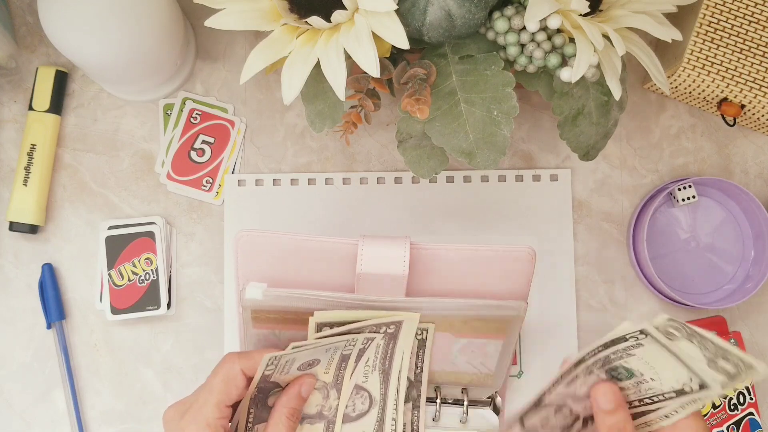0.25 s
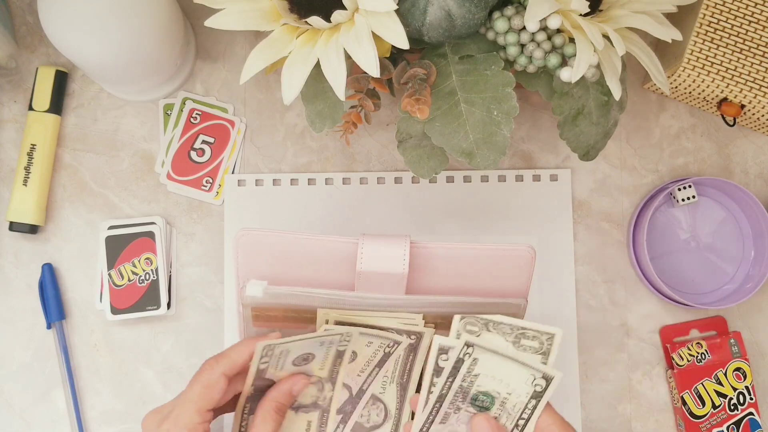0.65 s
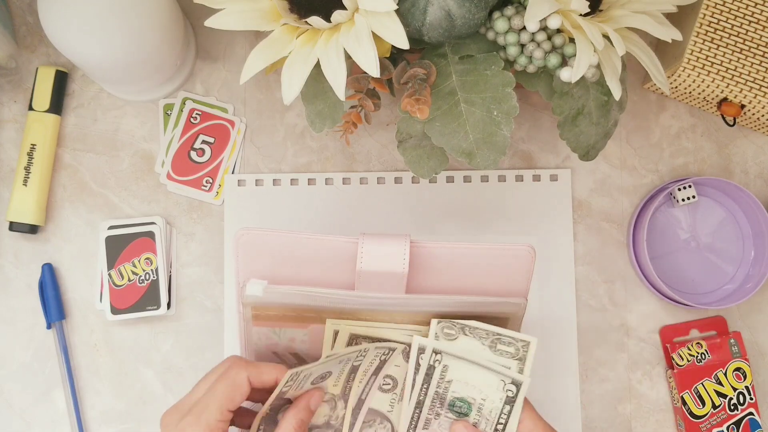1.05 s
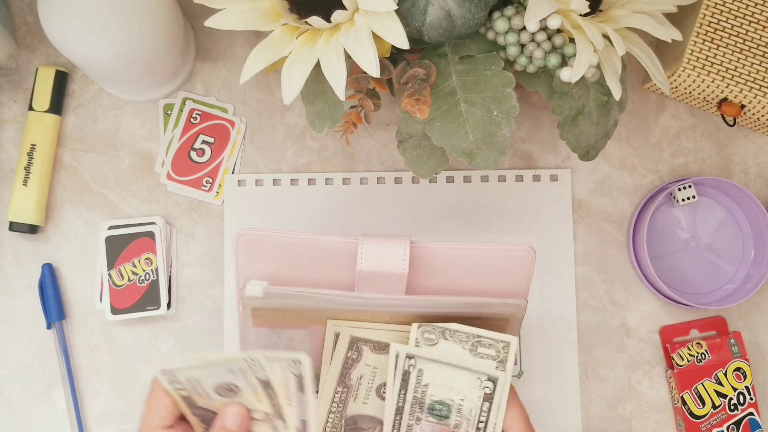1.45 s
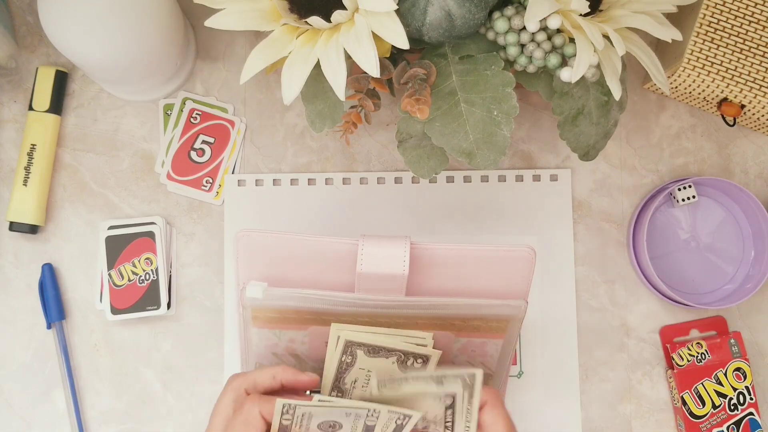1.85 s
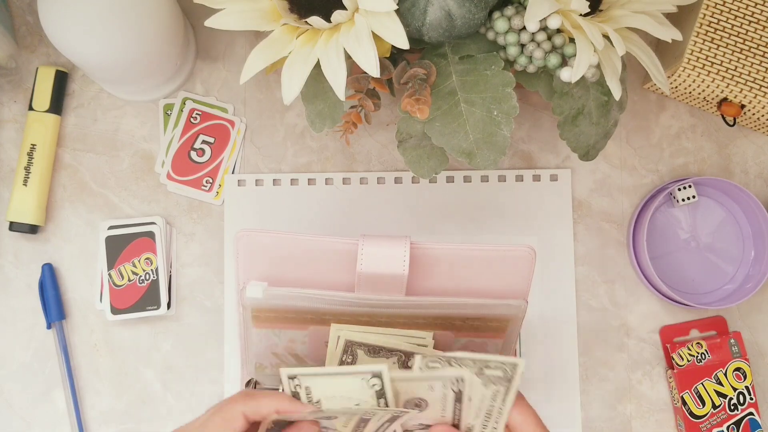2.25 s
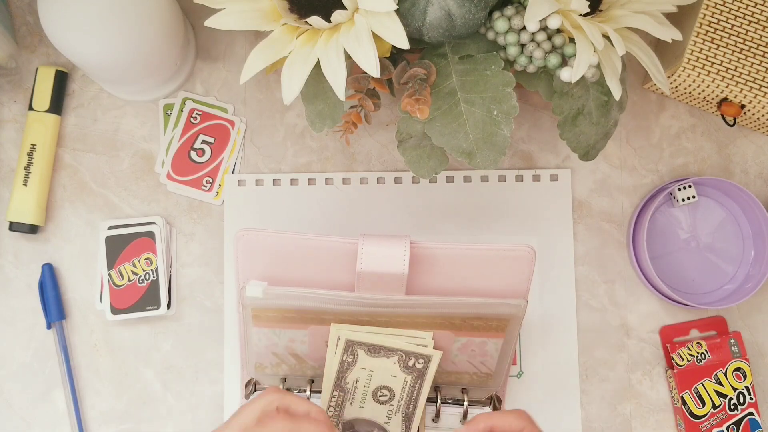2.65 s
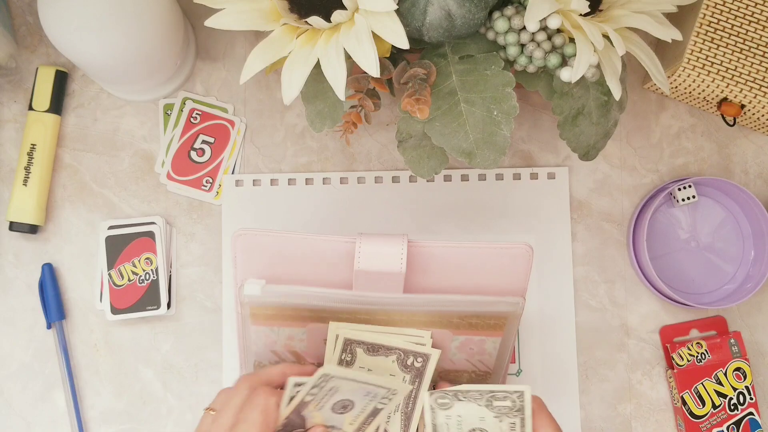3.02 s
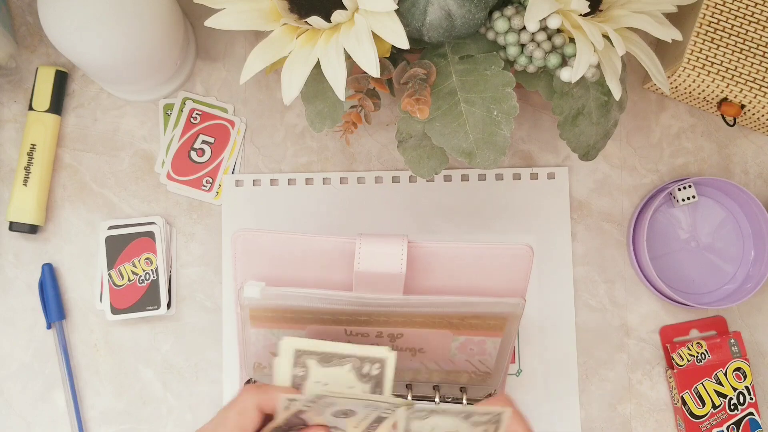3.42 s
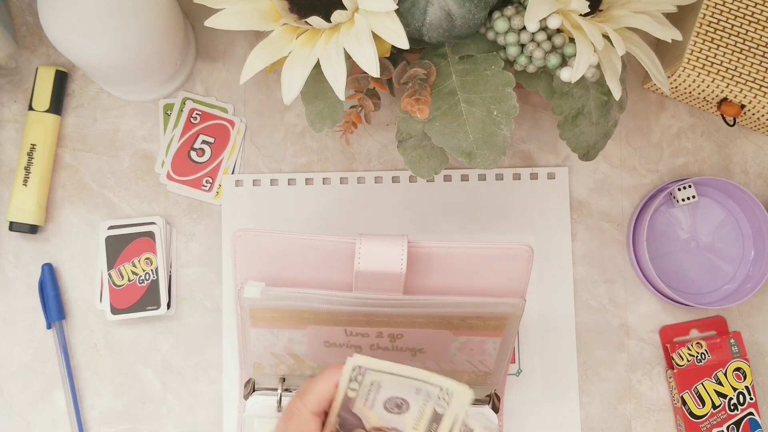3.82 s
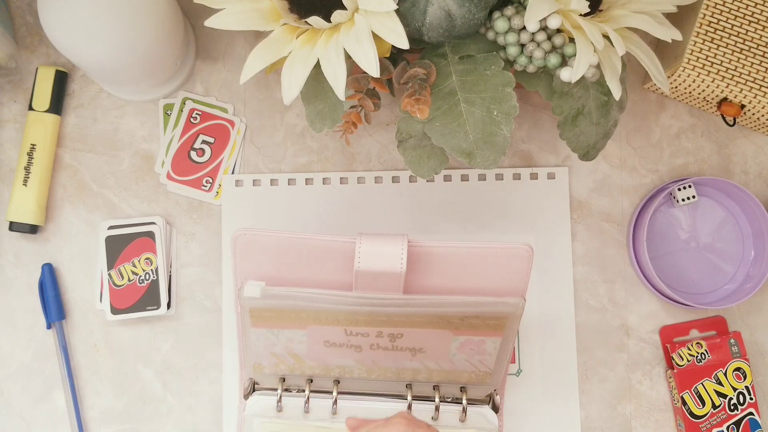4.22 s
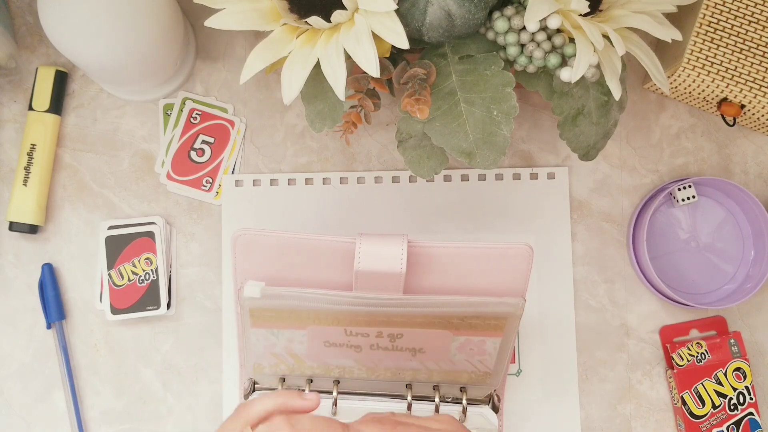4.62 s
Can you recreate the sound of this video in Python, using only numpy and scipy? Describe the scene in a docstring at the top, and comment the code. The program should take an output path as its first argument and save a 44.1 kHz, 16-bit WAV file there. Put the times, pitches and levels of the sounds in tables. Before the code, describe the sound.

A close, dry indoor sound of paper bills being handled over a table. A quick rustle with crisp ticks and a soft bump opens at about 0.1 seconds, a small jerk follows at 0.4, and a bright slide at 0.6. Lighter strokes thin out until nearly quiet around 1.4. At 1.6 a sheet is pulled with a snap and a dull knock. From about 1.9 to 2.8 the shuffling is dense, with grainy hiss, duller flexing and sharp crease snaps. Shorter strokes follow from 3 to 3.7, then a busy burst from 3.8 to 4.2, with muted hand bumps. The loudest, sharpest snap comes at about 4.4, after which rustling drops to faint traces and soft table taps near 4.6. Underneath, a low motor hum pulses slowly about three or four times a second, with mains buzz, rumble and barely audible air noise.

```python
"""Paper bills shuffled at a table

Hands shuffle a stack of paper bills into order close to the microphone, over a table in a quiet room.
Sheets slide with a grainy hiss and flex with a duller rustle: random clicks ring patches of the sheet.
Creases snap as a tick, a ring and a crackle; hands bump the table with short dull tones and knocks.
Two motors somewhere in the house hum a few hertz apart and beat, over mains buzz and low rumble."""
import sys
import numpy as np
from scipy import signal
from scipy.fft import rfft, irfft
from scipy.io import wavfile

SR = 44100
rng = np.random.default_rng(int(sys.argv[2]) if len(sys.argv) > 2 else 0)


def wav_out(sig):
    """Save sig, one row per channel (or a flat mono array), as 16-bit PCM at SR to the path in sys.argv[1]."""
    wavfile.write(sys.argv[1], SR, np.round(np.clip(np.atleast_2d(sig).T, -1, 1) * 32767).astype(np.int16))


def volts_from_decibels(level):
    """Turn decibel levels (scalar or array-like) into linear amplitude factors."""
    exponent = np.asarray(level, float) / 20
    return 10 ** exponent


N = 210435  # length in samples

# Overall colour of the flexing paper and its creaks. Each row: frequency in Hz, relative level in dB per Hz.
FLEX_SPECTRUM = [(330, -6.5), (440, -13.5), (720, 0.5), (850, -6), (1300, 2), (1500, 2), (1900, -2),
                 (2400, -3.5), (3200, -3.5)]


def rms_one(x):
    """Scales to rms 1."""
    return x / np.sqrt(np.mean(x ** 2) + 1e-20)


def at_hz(points, hz):
    """Reads a spectrum on a log-frequency axis."""
    point_hz, point_db = np.transpose(points)
    return np.interp(np.log(hz), np.log(point_hz), point_db)


def colour(x, points):
    """Shapes a steady texture by a spectrum that falls away outside its ends; rms 1."""
    hz = np.fft.rfftfreq(N, 1 / SR) + 1
    closed = [(points[0][0] / 2, -90), *points, (points[-1][0] * 2, -90)]
    return rms_one(irfft(rfft(x) * volts_from_decibels(at_hz(closed, hz)), N))


def drift(rate_hz):
    """Slow chance of spread 1: twice-smoothed noise, drawn at every 32nd sample."""
    r = np.exp(-2 * np.pi * rate_hz * 32 / SR)
    noise = rng.standard_normal(N // 32 + 1002)
    slow = signal.lfilter([1], [1, -2 * r, r * r], noise)[1000:]  # leaves out the filter's start
    return np.interp(np.arange(N) / 32, np.arange(len(slow)), rms_one(slow))


def in_time(rows):
    """Joins the rows of a curve by straight lines, one curve a column."""
    s, *columns = np.transpose(rows)
    return [np.interp(np.arange(N) / SR, s, c) for c in columns]


def resonate(x, hz, width_hz):
    """A two-pole resonance, gain 1 on top."""
    r = np.exp(-np.pi * width_hz / SR)
    poles = [1, -2 * r * np.cos(2 * np.pi * hz / SR), r * r]
    return signal.lfilter([(1 - r * r) / 2, 0, (r * r - 1) / 2], poles, x)


def grains(size, per_s, spread_db, hiss):
    """Fibres catch and let go: random clicks of uneven size over a smooth hiss."""
    chance, luck = rng.random((2, size))
    size_db = spread_db * np.minimum(-np.log(luck + 1e-9), 4)
    clicks = (chance < per_s / SR) * volts_from_decibels(size_db)
    return (rms_one(clicks) + hiss) * rng.standard_normal(size)


def house():
    """Steady sines, the two lowest close enough to beat, over rumble and faint air noise."""
    # Motors and mains buzz. Each row: frequency in Hz, level in dB rms.
    hum_lines = [(63.01, -39.6), (59.58, -48.0), (120.04, -53.6), (240.09, -75.3)]
    # Rumble and air noise. Each row: frequency in Hz, relative level in dB per Hz.
    rumble_spectrum = [(22, -10), (36, -29.5), (52, -2), (66, -5), (78, -6), (105, -18.5), (140, -14),
                       (165, -25.5), (200, -26.5), (300, -28.5), (420, -45.5), (900, -58), (1450, -52),
                       (2400, -70), (3500, -60), (6000, -57), (15000, -58)]
    rumble_db = -47.5  # rms
    in_step_s = 0.237  # a moment when the two motors are in step
    t = np.arange(N) / SR - in_step_s
    lines = sum(np.sqrt(2) * volts_from_decibels(db) * np.sin(2 * np.pi * hz * t) for hz, db in hum_lines)
    return lines + volts_from_decibels(rumble_db) * colour(rng.standard_normal(N), rumble_spectrum)


def room(x):
    """Dense echoes that start after a few milliseconds and die away, dull at the top."""
    t60_s, level_db = 0.093, -11.5
    t = np.arange(SR // 2) / SR
    echoes = rng.standard_normal(len(t)) * volts_from_decibels(-60 * t / t60_s) * (t > 0.003)
    echoes = signal.lfilter([1], [1, -0.6], echoes)
    echoes /= np.sqrt(np.sum(echoes ** 2))
    return volts_from_decibels(level_db) * signal.fftconvolve(x, echoes)[:N]


def bumps():
    """A soft hand gives a rounded push: the table top answers with a short dull tone and a knock above it."""
    # Hands on the table. Each row: start in seconds, peak in dB, tone in Hz, time to fall 60 dB in seconds.
    bump_rows = [(0.089, -40, 181, 0.086), (1.582, -42.5, 155, 0.087), (2.645, -45, 183, 0.085),
                 (3.681, -47.5, 231, 0.1), (3.791, -41.5, 173, 0.13), (4.02, -41, 307, 0.028),
                 (4.368, -42.5, 201, 0.071), (4.596, -45.5, 160, 0.048), (4.616, -43, 173, 0.052)]
    out, t = np.zeros(N + SR), np.arange(SR // 3) / SR
    board = signal.butter(2, [200, 600], "band", fs=SR, output="sos")
    rounded = 1 - np.exp(-t / 0.0013)
    for s, peak_db, hz, t60 in bump_rows:
        knock = rms_one(signal.sosfilt(board, rng.standard_normal(len(t))))
        tone = np.sin(2 * np.pi * hz * t)
        thud = (tone + 0.33 * knock) * rounded * volts_from_decibels(-60 * t / t60)
        at = round(s * SR)
        out[at:at + len(t)] += volts_from_decibels(peak_db) * thud / np.max(np.abs(thud))
    return out[:N]


def snaps():
    """A sharp tick rings the taut sheet at its own pitch, then a crackle dies away."""
    # Creases giving way. Each row: start in seconds, peak in dB, ring in Hz,
    # time for the crackle to fall 60 dB in seconds, broad part against the ring in dB.
    snap_rows = [(0.091, -31.5, 4500, 0.084, -12), (0.134, -28.5, 5680, 0.085, -3),
                 (0.3915, -34, 4400, 0.03, -13), (0.435, -37, 1660, 0.068, -12),
                 (0.941, -47.5, 5000, 0.02, 3), (1.6002, -29.5, 1950, 0.05, 16),
                 (2.163, -33, 3270, 0.094, -2), (2.196, -31, 3520, 0.047, -26),
                 (2.368, -27, 1400, 0.03, -18), (2.645, -26, 5400, 0.065, -8), (2.706, -25, 7400, 0.11, -6),
                 (2.72, -28.5, 4640, 0.045, -5), (2.965, -29.5, 740, 0.051, 7.5),
                 (3.004, -38.5, 1010, 0.01, -18), (3.02, -37.5, 1310, 0.03, -12),
                 (3.278, -43.5, 1400, 0.02, -14), (3.372, -45, 1360, 0.023, -14),
                 (3.727, -44, 5700, 0.03, -6), (4.3558, -41, 1500, 0.03, 5), (4.581, -48, 3930, 0.033, -2),
                 (3.177, -35.5, 3720, 0.073, -2), (3.22, -34.5, 1530, 0.097, -7),
                 (3.474, -31, 4770, 0.04, 6), (3.8, -32, 704, 0.097, -2.5), (3.817, -31, 780, 0.025, -4),
                 (3.879, -25, 3180, 0.022, -9), (4.017, -33, 1550, 0.046, -8.5),
                 (3.99, -31, 6500, 0.04, -6), (4.362, -27, 4730, 0.031, -3), (4.387, -14, 3440, 0.033, -5)]
    out, t = np.zeros(N + SR), np.arange(SR // 5) / SR
    wide = signal.butter(2, [900, 12000], "band", fs=SR, output="sos")
    for s, peak_db, hz, tail, wide_db in snap_rows:
        tick = rng.standard_normal(len(t)) * volts_from_decibels(-60 * t / 0.004)
        crackle = 0.26 * grains(len(t), per_s=4000.0, spread_db=2.5, hiss=0.6) * volts_from_decibels(-60 * t / tail)
        push = tick + crackle
        broad = rms_one(signal.sosfilt(wide, push))
        ring = rms_one(resonate(push, hz, width_hz=0.19 * hz))
        snap = volts_from_decibels(wide_db) * broad + ring
        at = round(s * SR)
        out[at:at + len(t)] += volts_from_decibels(peak_db) * snap / np.max(np.abs(snap))
    return out[:N]


def strokes():
    """Every stroke rises and falls by a steady number of dB a second; overlapping strokes add in power."""
    # Sheets sliding past each other. Each row: peak time in seconds, sliding in dB, flexing in dB,
    # seconds for sliding to rise 10 dB, seconds for it to fall 10 dB; shorter times are held at the shortest.
    swell_rows = [(.051, -48.5, -56.5, -0.35, 0.06), (.096, -41, -48.5, 0.06, 0.05),
                  (.171, -51, -60, 0.25, .045), (.291, -54.5, -67, .085, 0.1),
                  (.56, -53, -61.5, 0.05, 0.06), (.63, -45.5, -67, 0.13, 0.09), (.853, -50.5, -68, 0.08, 0),
                  (1.033, -54.5, -61, 0.19, 0.03), (1.13, -60.5, -76, -0.04, 0.16),
                  (1.232, -54, -65.5, 0.06, 0.1), (1.44, -65.5, -80, 0.3, 1.6),
                  (1.7, -67.5, -78, 0.3, 0.44), (1.875, -53, -58.5, 0.05, 0.05),
                  (1.997, -50, -56, 0.0441, 0.04), (2.08, -53, -56, 0.04, -0.01),
                  (2.151, -47.5, -52.5, 0.0446, 0.08), (2.369, -44, -47.5, 0.03, 0.13),
                  (2.535, -48, -53.5, 0.05, 0.09), (2.59, -41, -46.5, 0.06, 0.0546),
                  (2.726, -45, -56.5, 0.07, .07), (2.88, -56, -76.5, .15, .035),
                  (3.078, -47.5, -51.5, 0.0651, .07), (3.178, -52.5, -60.5, 0, 0.04),
                  (3.326, -50.5, -58.5, 0.11, 0.05), (3.415, -54, -62, 0.05, 0.08),
                  (3.53, -56.5, -68, .08, 0.12), (3.655, -60.5, -76, -0.1, -0.1),
                  (3.74, -53.5, -73, 0.02, -0.03), (3.795, -53, -59, 0, -0.03),
                  (3.974, -41, -47.5, 0.0067, 0.06), (3.88, -47, -49.5, 0.0544, 0.0459),
                  (4.019, -48, -42, 0.02, 0.04), (4.135, -38, -53, .018, 0.0335),
                  (4.2, -53, -64.5, -0.04, 0.06), (4.387, -35, -37, .012, 0.014),
                  (4.44, -56.5, -62.5, -0.04, 0.1), (4.52, -56.5, -68.5, -0.18, 0.19),
                  (4.67, -70, -72, 0.03, 0.2), (4.765, -56, -68, -0.14, 0.5)]
    # Sheets jerked free. Each row: peak time in seconds, sliding in dB, flexing in dB,
    # seconds for sliding to fall 10 dB.
    jerk_rows = [(0.391, -53, -58, 0.16), (1.603, -53, -53.5, 0.06), (1.811, -58.5, -66.5, 0.7),
                 (2.196, -46, -47.5, 0.09), (2.647, -41.5, -46.5, 0.05), (2.966, -54.5, -61.5, 0.13),
                 (3.22, -42.5, -49, 0.024), (3.474, -52.5, -68, 0.05), (3.801, -41, -43.5, 0.0835),
                 (4.3575, -43, -56.5, 0.06)]
    shortest_s, jerk_rise_s = 0.015, 0.0025  # for 10 dB
    flex_steepness = 1.2  # flexing swells and fades faster than sliding
    swells = [(s, a, b, max(rise, shortest_s), max(fall, shortest_s)) for s, a, b, rise, fall in swell_rows]
    jerks = [(s, a, b, jerk_rise_s, max(fall, shortest_s)) for s, a, b, fall in jerk_rows]
    t = np.arange(0, N + 32, 32) / SR
    slide_power, flex_power = 1e-12, 1e-12
    for s, slide_db, flex_db, rise, fall in swells + jerks:
        away_db = -10 * np.where(t < s, (s - t) / rise, (t - s) / fall)
        slide_power = slide_power + volts_from_decibels(slide_db + away_db) ** 2
        flex_power = flex_power + volts_from_decibels(flex_db + flex_steepness * away_db) ** 2
    return [np.interp(np.arange(N) / SR, t, np.sqrt(power)) for power in (slide_power, flex_power)]


def creaks():
    """Small folds pop: lone clicks, each heard across the flexing sheet for a few milliseconds; rms 1."""
    pops = grains(N, per_s=110, spread_db=2.0, hiss=0)
    dull = signal.lfilter([1], [1, -0.5], pops)
    return colour(dull + 1.8 * resonate(pops, 1430, width_hz=200), FLEX_SPECTRUM)


def patches(source, hiss, pitches_hz, shape_db, patchy_db):
    """Each grain rings one patch of the sheet at its own pitch; patches come and go as the paper bends."""
    out, count = np.zeros(N), len(pitches_hz)
    dealt = rng.integers(0, count, N)  # which patch each sample's grain rings
    white = rng.standard_normal((2, N))
    for k, hz in enumerate(pitches_hz):
        push = np.sqrt(count) * source * (dealt == k) + hiss * white[k % 2]
        gain = volts_from_decibels(shape_db(hz) + patchy_db * drift(rate_hz=6.4))
        out += (-1) ** k * gain * resonate(push, hz, width_hz=0.097 * hz)
    return out


def handling():
    """Sliding is bright fine grain, flexing a coarser and duller one; both come in clumps."""
    # Tone of the rustle over time. Each row: time in seconds, pitch of the sliding edge in Hz, its strength in
    # dB, # level of the flexing below about 1100 Hz in dB (it thins out at times), brightness of the sliding in
    # dB.
    tone_rows = [(0, 4860, -3, -4.5, 1.5), (.3, 5000, -1.5, 6, -0.5), (.5, 9600, 0, 7.5, 0.5),
                 (.66, 9600, 10.5, -36, 1.5), (.76, 9400, 6, 1, 1), (.82, 6000, 10, 1, 6),
                 (1.4, 6000, 5, -6.5, 1), (1.62, 3950, 6.5, 8.5, 0), (1.97, 4200, 0, -11, 3.5),
                 (2.16, 3460, 10, -11.5, 3), (2.4, 4940, 0, 4, 2), (2.75, 6500, 3.5, -3.5, -2),
                 (2.94, 5100, 1.5, 17, -4), (3.08, 3360, 4, -5.5, -4.5), (3.55, 5600, 2, 8.5, 4),
                 (3.75, 5540, 6.5, 5.5, 5), (3.85, 3620, 9.5, 6.5, 0.5), (4.0, 3670, 1, 0.5, 5),
                 (4.14, 3440, 4.5, -14, -8), (4.4, 3540, -2, 9.5, 0), (4.77, 5750, 9, -9, 0)]
    # Overall colour of the sliding. Each row: frequency in Hz, relative level in dB per Hz.
    slide_spectrum = [(1800, -7), (2400, -9), (3400, 1), (4300, -0.5), (6000, -0.5), (8300, -5),
                      (9500, -3.5), (13500, -6.5), (15200, -21)]
    creak_db = -10  # against the flexing
    slide_gain, flex_gain = strokes()
    edge_hz, edge_db, low_db, bright_db = in_time(tone_rows)
    clumps_db = 0.99 * drift(rate_hz=20.0) + 1.07 * drift(rate_hz=92.0)

    def slide_shape(hz):
        """Brightness lifts the top; the edge adds a hump."""
        hump = np.exp(-(np.log(hz / edge_hz) / 0.09) ** 2)
        return bright_db / (1 + (7000 / hz) ** 8) + edge_db * hump

    def flex_shape(hz):
        """The low level acts below about 1100 Hz, where the rustle thins out at times."""
        return low_db / (1 + (hz / 1100) ** 6)

    fine = grains(N, per_s=5000.0, spread_db=3.5, hiss=0)
    coarse = grains(N, per_s=3000.0, spread_db=2.5, hiss=0)
    # patch pitches lie in even musical steps
    slide = patches(fine, 2.6, np.geomspace(1820, 15380, 24), slide_shape, patchy_db=2.0)
    flex = patches(coarse, 1.33, np.geomspace(376.6, 2980, 20), flex_shape, patchy_db=4.0)
    rustle = colour(flex, FLEX_SPECTRUM) + volts_from_decibels(creak_db) * creaks()
    slide = colour(slide, slide_spectrum) * slide_gain * volts_from_decibels(clumps_db)
    return slide + rustle * flex_gain * volts_from_decibels(1.7 * clumps_db)


def scene():
    """Paper and hands in the room, with a narrow dip, likely the echo off the table top, over the house."""
    near = handling() + snaps() + bumps()
    heard = near + room(near)
    hollow = 0.9 * resonate(heard, 2456, width_hz=300)
    return (heard - hollow + house())[None]


def low_pass(x):
    """Removes everything above the highest recorded frequency."""
    return signal.sosfilt(signal.butter(12, 15530, fs=SR, output="sos"), x)


def record(dry):
    """The top is cut steeply above about 15 kHz."""
    cut = signal.cheby2(14, 45, 15250, fs=SR, output="sos")
    return low_pass(signal.sosfilt(cut, dry))


dry = scene()
out = record(dry)
wav_out(out)
```